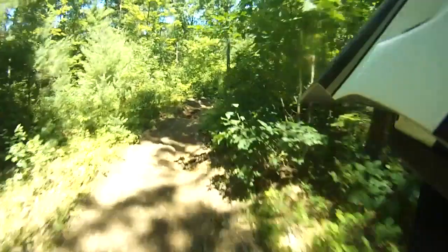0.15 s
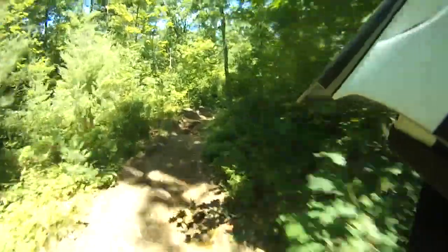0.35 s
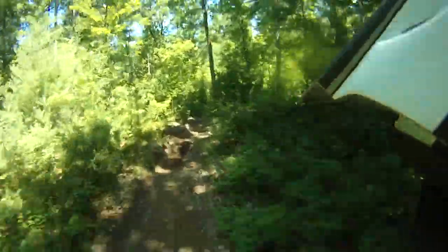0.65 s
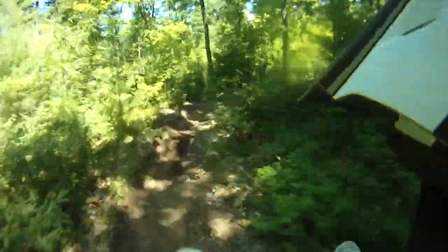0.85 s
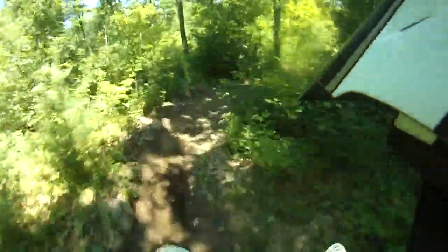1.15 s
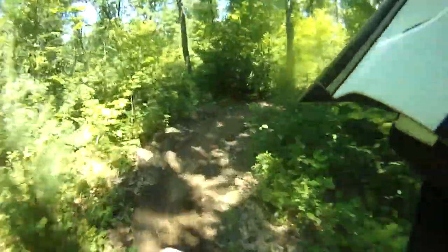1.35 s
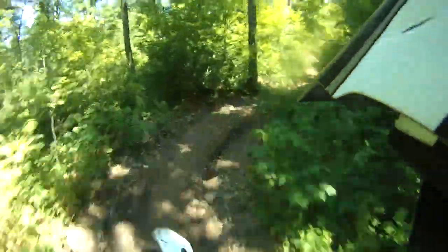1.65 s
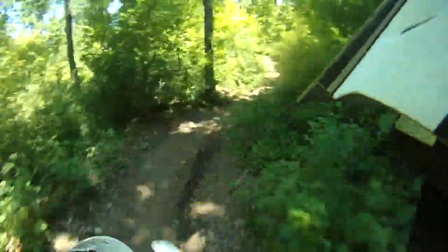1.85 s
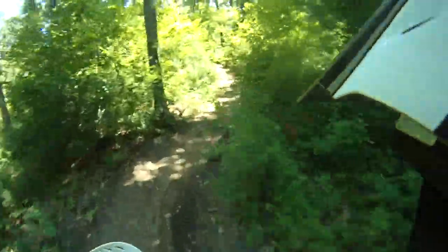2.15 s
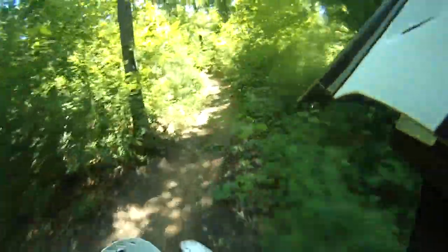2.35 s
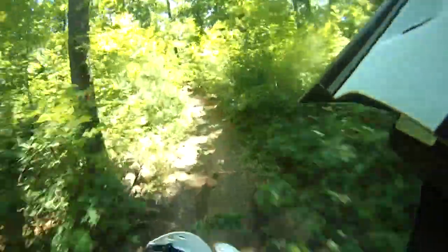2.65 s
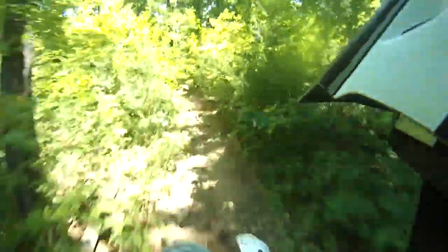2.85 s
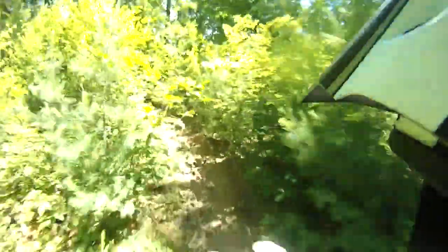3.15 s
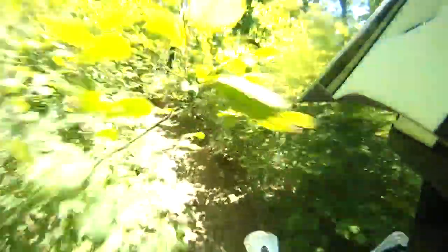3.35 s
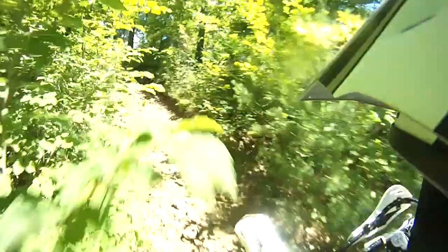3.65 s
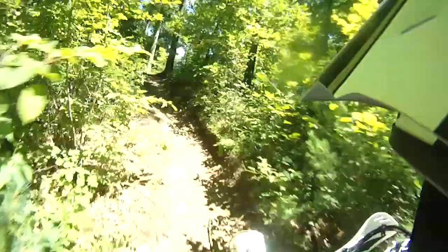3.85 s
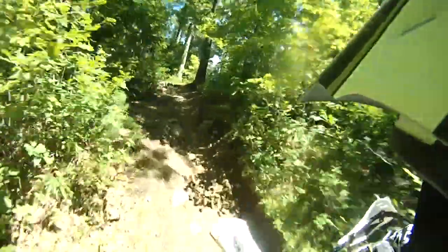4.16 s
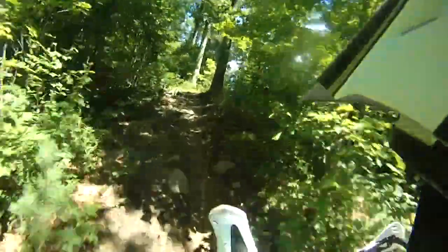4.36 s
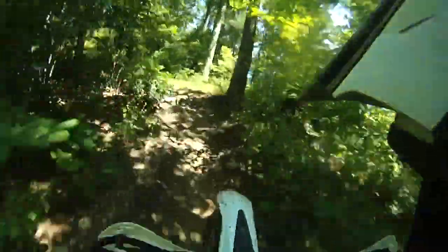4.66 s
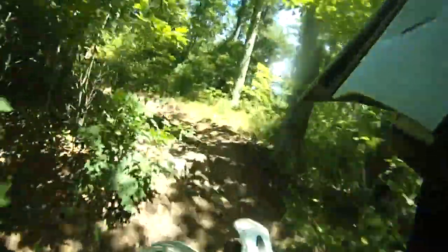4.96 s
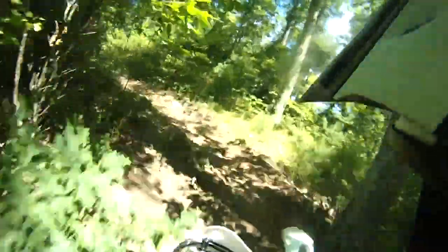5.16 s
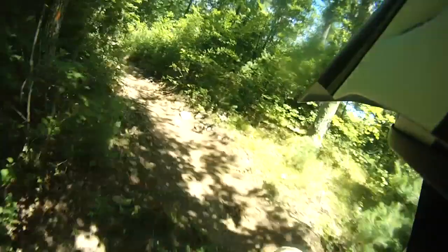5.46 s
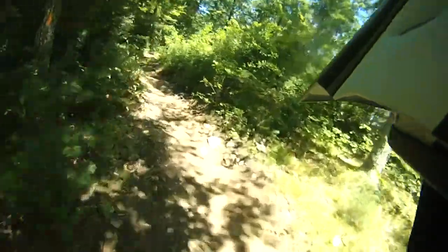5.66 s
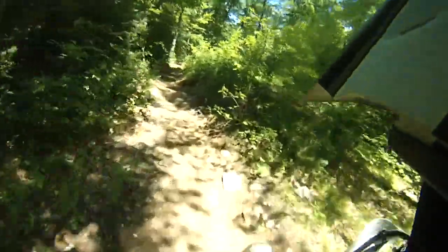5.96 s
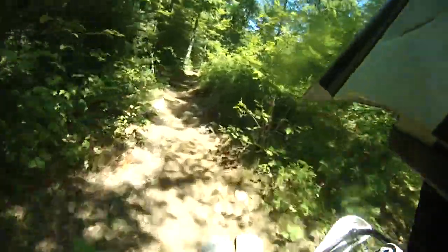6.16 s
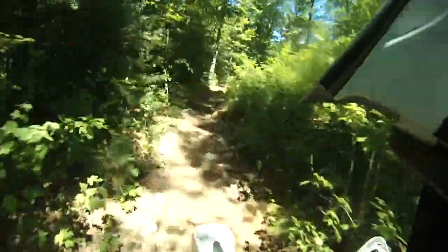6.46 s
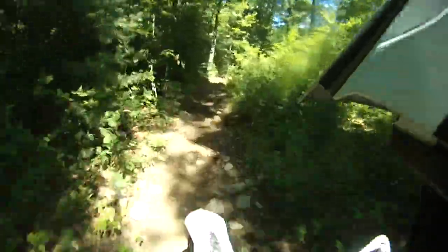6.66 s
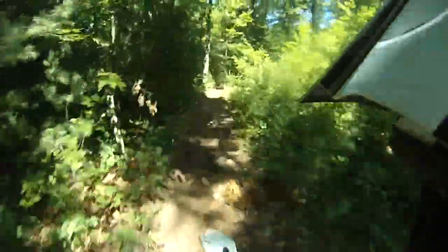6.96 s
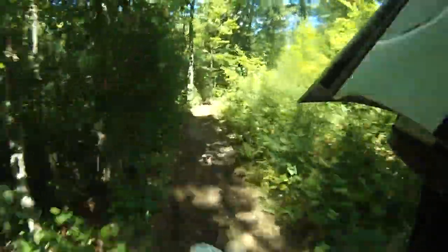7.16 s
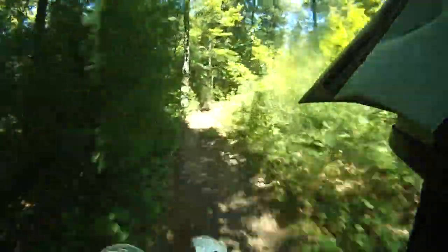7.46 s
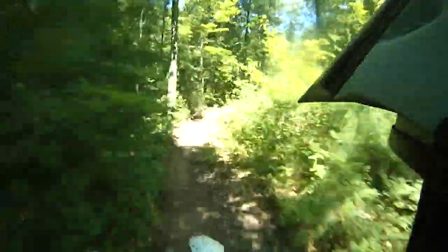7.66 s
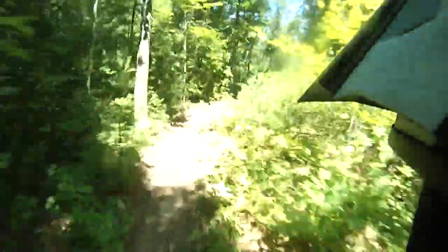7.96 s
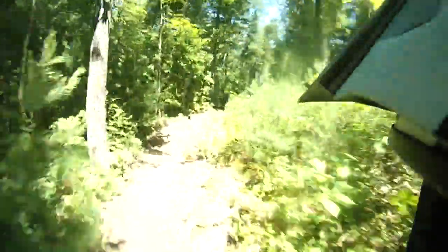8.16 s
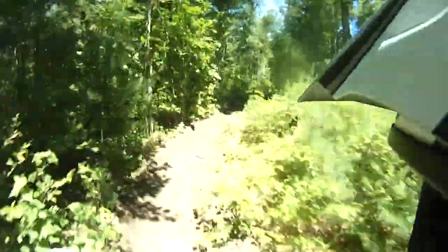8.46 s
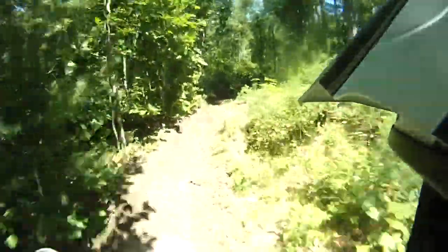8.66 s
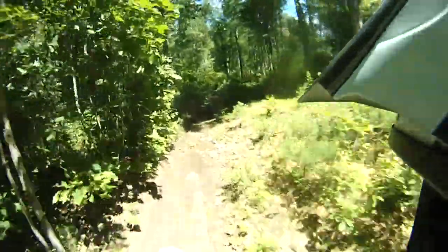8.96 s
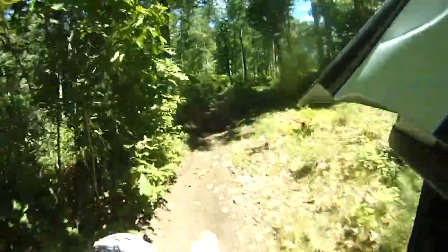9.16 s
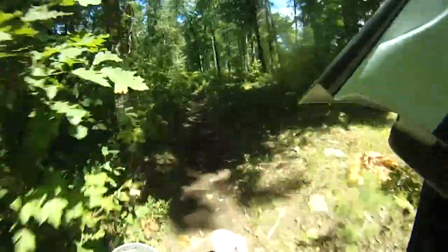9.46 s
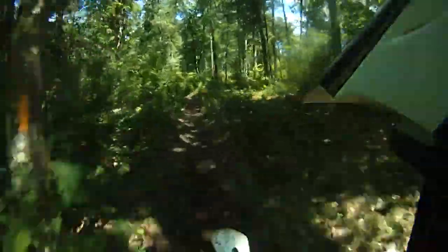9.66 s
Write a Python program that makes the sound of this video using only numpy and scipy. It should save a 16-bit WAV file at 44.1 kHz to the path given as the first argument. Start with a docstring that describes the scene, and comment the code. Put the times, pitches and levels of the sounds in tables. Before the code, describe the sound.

A two-stroke dirt bike on a wooded trail, heard from the rider's helmet. It first coasts with a quiet, uneven sputter and chain rattle, then barks through several throttle bursts. A violent crunch of branches and hard knocks interrupts a coasting gap. More revs, a long lull and another raspy run follow, with a smaller branch snap and wind pops late on.

```python
"""Two-stroke dirt bike on a trail

A two-stroke dirt bike on a wooded trail, heard at a microphone on the rider's helmet.
Throttle bursts pass firing pulses through exhaust resonances; between them noise sputters and rattles.
Damped modes thud for bumps and knocks, short filtered noise makes twigs tick and branches scrape,
steep pressure spikes crack on the helmet, and low noise buffets while gusts pop on the microphone."""
import sys
import numpy as np
from scipy import signal
from scipy.fft import rfft, irfft
from scipy.io import wavfile
from scipy.ndimage import uniform_filter1d

SR = 44100
rng = np.random.default_rng(int(sys.argv[2]) if len(sys.argv) > 2 else 0)


def unload_audio(sound):
    """Save the sound as a 16-bit wav file, at the path given as the first command line argument."""
    columns = np.transpose(np.atleast_2d(sound))
    # keep every value between -1 and 1, then stretch to whole-number steps
    steps = np.round(np.clip(columns, -1, 1) * 32767)
    wavfile.write(sys.argv[1], SR, steps.astype(np.int16))


N = 432180
TIME = np.arange(N) / SR


def amp(db):
    """Decibel law: level in dB to amplitude gain."""
    return 10 ** (np.asarray(db) / 20)


def unit(x):
    """Power normalisation: scales to rms 1."""
    return x / np.sqrt(np.mean(x ** 2) + 1e-20)


def steady(x):
    """Short-time power normalisation: evens out the slow level but keeps the single pulses."""
    power = uniform_filter1d(uniform_filter1d(x ** 2, size=2600), size=2600)
    return x / np.sqrt(np.abs(power) + 1e-12)


def blend(a, b, share):
    """Linear interpolation from a to b as the share goes from 0 to 1."""
    return a + (b - a) * share


def curves(rows):
    """Piecewise linear interpolation of rows (s, values): one curve a column."""
    s, *columns = rows[np.argsort(rows[:, 0])].T
    return [np.interp(TIME, s, c) for c in columns]


def add(mix, s, sound):
    """Superposition: mixes a sound in at time s."""
    part = mix[max(round(s * SR), 0):][:len(sound)]
    part += sound[:len(part)]


def wander(per_s):
    """Random modulation: straight lines between per_s random values a second, rms 1."""
    return unit(np.interp(TIME * per_s, np.arange(N), rng.standard_normal(N)))


def colour(x, points, tilt_db=0, size=4096):
    """Minimum-phase filtering: a causal response of given spectrum, tilted in dB per octave above 512 Hz."""
    octaves = np.log2(np.abs(np.fft.fftfreq(size, 1 / SR)) + 1)
    hz, db = np.transpose(points)
    treble = np.maximum(octaves - 9, 0)
    log_gain = np.log(amp(np.interp(octaves, np.log2(hz), db) + tilt_db * treble))
    # the Hilbert transform of the log gain gives the minimum phase
    ring = np.fft.ifft(np.exp(np.conj(signal.hilbert(log_gain)))).real
    return signal.oaconvolve(x, ring)[:len(x)]


def resonate(x, hz, width_hz):
    """Simple resonance: one fixed damped mode of gain 1 at its centre."""
    pole = np.exp((2j * hz - width_hz) * np.pi / SR)
    return 2 * signal.lfilter([1 - abs(pole)], [1, -pole], x + 1e-18).real


def slide(x, hz, width_hz):
    """Heterodyne filtering: a resonance of gain 1 whose centre follows a curve."""
    turn = np.exp(2j * np.pi * np.cumsum(hz) / SR)
    r = np.exp(-np.pi * width_hz / SR)
    baseband = signal.lfilter([1 - r], [1, -r], x / turn + 1e-18)
    return 2 * (turn * baseband).real


def disperse(x, echoes):
    """All-pass reverberation: waves bounce to and fro, spreading each pulse but keeping its spectrum."""
    spectrum, hz = rfft(x), np.fft.rfftfreq(N, 1 / SR)
    for trip_s, share in echoes:
        delay = np.exp(-2j * np.pi * hz * trip_s)
        back = np.clip(share, 0, .85)
        spectrum = spectrum * (delay - back) / (1 - back * delay)
    return irfft(spectrum, N)


# Crank speed. Each row: time in seconds, firings per second.
CRANK_SPEED = [(0, 67), (1.818, 49), (1.87, 78), (1.911, 76), (1.952, 61), (2.0, 67.5), (2.121, 66),
               (2.21, 70.5), (2.27, 66.5), (2.32, 60), (2.36, 47.3), (2.42, 48), (2.499, 50), (2.65, 53.5),
               (2.74, 57.3), (2.88, 58), (2.97, 62.5), (3.036, 56.3), (3.12, 65.4), (3.21, 66.5),
               (3.301, 54), (3.68, 51), (3.84, 62), (3.931, 50), (4.0, 57), (4.114, 66.5), (4.175, 57.3),
               (4.29, 66), (4.4, 67), (4.549, 64.3), (4.7, 67), (5.979, 41), (6.032, 46.4), (6.081, 58),
               (6.16, 70), (6.218, 64), (6.3, 57.5), (6.391, 53), (6.44, 55), (6.55, 52.3), (6.605, 62),
               (6.723, 59.8), (6.92, 66), (6.97, 65.3), (7.049, 67.2), (7.551, 65), (8.88, 48.7),
               (8.999, 70), (9.059, 69), (9.16, 62.8), (9.28, 66.7), (9.381, 64), (9.5, 66), (9.599, 71),
               (9.699, 73.3), (9.8, 72.3)]
# Overrun with the throttle shut, louder the faster the bike rolls.
# Each row: time in seconds, relative sputter level in dB.
COAST_LEVEL = [(0, -51.5), (0.371, -47), (0.599, -51.5), (.95, -52.5), (1.25, -58.5), (1.78, -56),
               (2.499, -50), (3.33, -50.5), (3.45, -45), (3.659, -59.5), (4.648, -48), (5.049, -55),
               (5.949, -55), (7.15, -41.5), (7.679, -44.5), (7.898, -49.5), (8.25, -45), (8.36, -53),
               (8.6, -59.5), (8.88, -60)]
# unevenness of combustion (0-1): shut, pulling cleanly, and added per Hz below the clean speed
ROUGH_SHUT, ROUGH_PULLING, LUG_PER_HZ, CLEAN_HZ = .62, .11, .002, 64
COAST_BARK_DB, COAST_HEAT = -1.5, 0.51
# mechanical noise grows more slowly than the exhaust (slope in dB per dB)
COAST_RATTLE_DB, LOAD_RATTLE_DB, RATTLE_SLOPE = -9, -33, 0.63
# the drive goes taut under load and rattles less
PULL_RATTLE_DB = -4
# hiss relative to rattle; off the throttle its share falls as the overrun grows louder than the pivot
COAST_HISS_DB, LOAD_HISS_DB, HISS_SLOPE, HISS_PIVOT_DB = -14, -8.5, 0.31, -47.5


def engine(burble_db=3.5, burble_per_s=22):
    """Two-stroke cycle: one firing and puff of gas a turn; throttle makes it louder, cleaner and brighter."""
    hz, = curves(np.array(CRANK_SPEED))
    coast_db, = curves(np.array(COAST_LEVEL))
    drive, bark_db, heat = throttle()
    coast = amp(coast_db + burble_db * wander(burble_per_s))
    level = np.hypot(drive, coast)
    load = (drive / level) ** 2
    rough_pulling = ROUGH_PULLING + LUG_PER_HZ * np.maximum(CLEAN_HZ - hz, 0)
    rough = np.clip(blend(ROUGH_SHUT, rough_pulling, load), 0, 1)

    turns = np.cumsum(hz) / SR
    pulses = firings(turns, rough)
    # gas flow decays after each firing, more evenly spread when combustion is rough
    port = .6 + (1 - .6 * rough) * np.exp(-(turns % 1) / .3)
    puffs = unit(port * rng.standard_normal(N))

    clatter = np.hypot(amp(coast_db + COAST_RATTLE_DB), amp(LOAD_RATTLE_DB) * drive ** RATTLE_SLOPE)
    coast_hiss_db = COAST_HISS_DB - HISS_SLOPE * (coast_db - HISS_PIVOT_DB)
    bright_db = blend(coast_hiss_db, LOAD_HISS_DB, load)
    taut_db = PULL_RATTLE_DB * load
    share_db = blend(COAST_BARK_DB, bark_db, load)
    gas_heat = blend(COAST_HEAT, heat, load)
    # subtracting taut_db leaves the hiss unchanged as the rattle drops
    return (exhaust(pulses, puffs, rough, level, share_db, gas_heat, hz)
            + machinery(pulses, puffs, rough, clatter * amp(taut_db), bright_db - taut_db)
            + buzz(turns, hz, clatter * load)
            + crackle(turns, hz, clatter * load))


# Twists of the throttle. Each row: opening in seconds, shutting in seconds, relative exhaust level in dB,
# attack time constant in seconds, power share of the pipe's upper bark in dB, gas heat from 0 to 1.
THROTTLE_TWISTS = [ (1.847, 1.968, -38, 0.0045, -7.5, 0.54), (1.962, 2.1, -42.5, 0.022, -6, 0.43),
                   (2.106, 2.277, -30.5, 0.016, -6.5, 0.35), (2.368, 2.683, -38, 0.057, -3.5, 0.56),
                   (2.68, 3.055, -37, 0.034, -9, 0.37), (3.072, 3.21, -31.5, 0.024, -7, 0.08),
                   (3.725, 3.836, -41.5, 0.01, -5, 0.48), (3.997, 4.156, -31, 0.029, -3, 0.44),
                   (4.15, 4.669, -34.5, 0.012, -4.5, 0.43), (6.04, 6.054, -35, 0.007, -2, 0.6),
                   (6.069, 6.115, -34, 0.0087, -1, 0.56), (6.146, 6.167, -24, 0.012, -6.5, 0.26),
                   (6.196, 6.516, -35.5, 0.011, -3, 0.1), (6.561, 7.141, -36, 0.02, -5, 0.54),
                   (7.32, 7.489, -40.5, 0.016, -7, 0.47), (8.943, 9.035, -38.5, .011, -5, 0.38),
                   (9.078, 9.338, -38.5, 0.056, -7, 0.63), (9.411, 9.786, -31, 0.029, -5.5, 0.53), ]
RELEASE_S, SAG_DB_PER_S = 0.023, 1.5  # every twist eases off slowly, then closes


def throttle():
    """Envelope superposition: summed amplitude of all twists, with their weighted mean bark and heat."""
    start, shut, db, attack, bark_db, heat = np.transpose(THROTTLE_TWISTS)[:, :, None]
    t = TIME[::32]
    opening = .5 * (1 + np.tanh((t - start) / (2 * attack)))
    closing = .5 * (1 - np.tanh((t - shut) / (2 * RELEASE_S)))
    sagging_db = db - SAG_DB_PER_S * (t - (start + shut) / 2)
    weight = opening * closing * amp(sagging_db) + 1e-12
    total = weight.sum(0)
    mean_bark_db = (weight * bark_db).sum(0) / total
    mean_heat = (weight * heat).sum(0) / total
    return [np.interp(TIME, t, c) for c in (total, mean_bark_db, mean_heat)]


def firings(turns, rough, spread_db=.25, rough_spread_db=5, slip=.22):
    """Periodic impulse train: one pulse a turn, uneven in size and timing when combustion is poor."""
    at = np.flatnonzero(np.diff(np.floor(turns)) > 0)
    size, late = rng.standard_normal((len(at), 2)).T
    place = at + slip * rough[at] ** 2 * late * np.gradient(at)
    pulses = np.zeros(N)
    size_db = size * (spread_db + rough_spread_db * rough[at] ** 2)
    pulses[np.clip(place, 0, N - 1).astype(int)] = amp(size_db)
    return pulses


# Spectrum of the bark above the boom. Each row: frequency in Hz, relative level in dB per Hz.
BARK_COLOUR = [(220, -22.5), (345, 13), (392, 1.5), (440, 6), (510, 0.5), (590, 2), (650, 2), (750, -7),
               (900, -20.5), (1100, -26), (2000, -23), (5000, -63)]
# Spectrum of the low sputter off the throttle. Each row: frequency in Hz, relative level in dB per Hz.
SPUTTER_COLOUR = [(50, -25.5), (130, -11.5), (220, 4), (300, -3), (400, 5), (550, -36), (1000, -54.5)]
# Upper exhaust resonance, sliding with throttle and gas heat. Each row: time in seconds, centre in Hz.
HONK_CENTRE = [(1.88, 593), (2.05, 534), (2.45, 555), (2.68, 593), (2.78, 685), (2.9, 675), (3.04, 455),
               (3.13, 520), (3.72, 589.7), (3.96, 585.4), (4.11, 538), (4.179, 427), (4.29, 538),
               (4.65, 530), (6.04, 515), (6.085, 597), (6.17, 503), (6.27, 460), (6.3, 585), (6.39, 600),
               (6.56, 597), (6.6, 494), (6.72, 469), (6.92, 520), (7.4, 549), (8.96, 466), (9.0, 557),
               (9.5, 537), (9.7, 593)]
# Echoes in the pipe that smear each pulse. Each row: round trip in seconds, share reflected.
PIPE_BOUNCES = [(.0019, 0.74), (.0036, 0.43)]
HONK_DB, HONK_WIDTH_HZ = 3, 50
STROKE_DB = 1.1  # random spread from stroke to stroke
PUTTER_DB, PUTTERS_PER_S = 6, 55


def exhaust(pulses, puffs, rough, level, share_db, heat, hz, pipe_db=5.0, bark_db=0):
    """Source and resonator: pulses boom in the pipe, with bark and one moving honk above; rough adds sputter."""
    share = np.clip(amp(share_db) ** 2, 0, .8)
    clean_boom = in_tune(pipe(pulses, heat), hz, level)
    sputter = unit(colour(puffs, SPUTTER_COLOUR))
    boom = steady((1 - rough) * clean_boom + rough * sputter)

    fronts = disperse(pulses * amp(STROKE_DB * rng.standard_normal(N)), PIPE_BOUNCES)
    clean_bark = steady(colour(fronts, BARK_COLOUR))
    breath = unit(colour(puffs, BARK_COLOUR))
    bark = steady((1 - rough) * clean_bark + rough * breath)
    honk = steady(slide(bark, curves(np.array(HONK_CENTRE))[0], HONK_WIDTH_HZ))
    bark = steady(steady(ground_echo(bark)) + amp(HONK_DB) * (1 - rough) * honk)

    putter = amp(PUTTER_DB * rough ** 2 * wander(PUTTERS_PER_S))
    low = amp(pipe_db) * np.sqrt(1 - share) * boom
    high = amp(bark_db) * np.sqrt(share) * bark
    return level * putter * (low + high)


# Spectrum of the cool exhaust chamber. Each row: frequency in Hz, relative level in dB per Hz.
PIPE_COLOUR = [(40, -52), (85, -20), (108, -11.5), (145, -29.5), (172, -16.5), (198, -0.5), (215, 1),
               (232, 9), (265, 16.5), (310, 8.5), (352, -15), (390, -20.5), (470, -16), (700, -17),
               (1500, -74)]


def pipe(pulses, heat, hot_ratio=1.159):
    """Speed of sound in hot gas: it rises with heat, and the chamber's resonance moves up."""
    cool = colour(pulses, PIPE_COLOUR)
    hot = colour(pulses, np.array(PIPE_COLOUR) * [hot_ratio, 1])
    return steady(blend(cool, hot, np.clip(heat, 0, 1)))


# the chamber comes into tune at high revs on a wide throttle
TUNED_FROM_HZ, TUNED_SPAN_HZ, TUNED_WIDTH_HZ, FLAT_OUT_DB = 68, 3, 65, -30


def in_tune(boom, hz, level, order=4):
    """Harmonic locking: flat out, the chamber favours one multiple of the firing rate and sounds lean."""
    fast = np.clip((hz - TUNED_FROM_HZ) / TUNED_SPAN_HZ, 0, 1)
    wide_open = np.minimum(level / amp(FLAT_OUT_DB), 1) ** 2
    return steady(blend(boom, slide(boom, order * hz, TUNED_WIDTH_HZ), fast * wide_open))


# mean delay and sway in s, share reflected
GROUND_S, GROUND_SWAY_S, GROUND_SHARE, SWAYS_PER_S = .0052, .00035, .5, 4


def ground_echo(x):
    """Comb interference: a reflection's path changes as the rider moves, so overtones swell and fade."""
    delay = GROUND_S + GROUND_SWAY_S * uniform_filter1d(wander(SWAYS_PER_S), size=4000)
    return x + GROUND_SHARE * np.interp(TIME - delay, TIME, x)


# Echoes in the pipe wall that smear each pulse. Each row: round trip in seconds, share reflected.
WALL_BOUNCES = [(.00053, 0.7), (.00091, 0.8), (.00147, .6), (.00231, 0.61)]
# Spectrum of the pipe wall's ring under load. Each row: frequency in Hz, relative level in dB per Hz.
RASP_SPECTRUM = [(500, -29), (850, 12), (1000, 11), (1250, 4.5), (1490, 7.5), (1710, 7), (1880, 8),
                 (2020, 9), (2200, 0.5), (2530, 14), (3100, 0.5), (3600, -17), (4500, -49.5), (9000, -65.5)]
# Spectrum of the slack chain's rattle. Each row: frequency in Hz, relative level in dB per Hz.
RATTLE_SPECTRUM = [(350, -33), (620, -19), (830, 6), (1100, 4.5), (1400, 3), (1750, 0), (2300, 2.5),
                   (3000, -13), (3600, -19), (4500, -44.5), (9000, -101.5)]
# Spectrum of the mechanical hiss. Each row: frequency in Hz, relative level in dB per Hz.
HISS_SPECTRUM = [(2800, -12), (3900, -6), (4300, -6), (4720, -6.5), (5100, -7), (5600, -15.5), (6100, -8),
                 (6450, -13.5), (6950, -7), (7500, -19.5), (9200, -12.5), (10500, -24.5), (13500, -29),
                 (15500, -52)]
GRIT_S, GRIT_SHARE = .0022, .6  # decay of the noise after each stroke, and its share


def machinery(pulses, puffs, rough, clatter, bright_db, rattle_db=4.5, hiss_db=0, slap_db=1.5):
    """Structure-borne sound: firings rasp in the pipe wall under load; a slack chain rattles off it."""
    strokes = pulses * amp(STROKE_DB * rng.standard_normal(N))
    grit_envelope = signal.lfilter([1], [1, -np.exp(-1 / (GRIT_S * SR))], strokes)
    grit = grit_envelope * rng.standard_normal(N)
    smeared = disperse(disperse(strokes, WALL_BOUNCES), PIPE_BOUNCES)
    clacks = steady(unit(smeared) + GRIT_SHARE * unit(grit))

    load = .96 * (1 - rough) ** 1.5
    rasp = np.sqrt(load) * steady(steady(colour(clacks, RASP_SPECTRUM)) + wall_ring(clacks))
    rattle = np.sqrt(1 - load) * unit(colour(puffs, RATTLE_SPECTRUM))
    hiss = steady(colour(load * clacks + puffs, HISS_SPECTRUM))
    level = clatter * amp(slap_db * rough * wander(90))
    return level * (amp(rattle_db) * (rasp + rattle) + amp(hiss_db + bright_db) * hiss)


# Sharpest modes of the pipe wall. Each row: frequency in Hz, relative level in dB.
WALL_RESONANCES = [(1510, -18), (1850, -14.5), (2130, -13.5), (2500, -6.5), (3150, -17), (4690, -21)]
WALL_WIDTH_HZ, FLARE_DB, FLARES_PER_S = 90, 4.5, 24


def wall_ring(clacks, ring_db=0):
    """Modal superposition: the wall's modes flare and fade independently as the bike shakes."""
    total = 0
    for hz, db in WALL_RESONANCES:
        mode = resonate(resonate(clacks, hz, WALL_WIDTH_HZ), hz, 1000)
        total = total + amp(db) * unit(mode * amp(FLARE_DB * wander(FLARES_PER_S)))
    return amp(ring_db) * total


# Spectrum of the clean overtones. Each row: frequency in Hz, relative level in dB per Hz.
BUZZ_SPECTRUM = [(650, -25), (810, -1), (930, 0), (1120, -3), (1300, -10), (1520, -4), (1900, -6),
                 (2600, -11), (3600, -35)]
BUZZ_DB, BUZZ_DB_PER_HZ = -2, .3  # relative to the mechanical noise; growth with firing rate


def buzz(turns, hz, level):
    """Harmonic series: clean firing gives sharp overtones above the bark, stronger at high revs."""
    even = disperse(firings(turns, np.zeros(N)), PIPE_BOUNCES)
    overtones = steady(ground_echo(colour(even, BUZZ_SPECTRUM)))
    return level * amp(BUZZ_DB + BUZZ_DB_PER_HZ * (hz - CLEAN_HZ)) * overtones


# Spectrum of the crackle at the port. Each row: frequency in Hz, relative level in dB per Hz.
CRACKLE_SPECTRUM = [(700, -32), (1400, 4), (2050, 5.5), (2600, -4.5), (3300, -7.5), (4000, -28),
                    (4750, -14.5), (5600, -33), (6900, -25.5), (11000, -60)]
# relative to the mechanical noise; growth as the firing rate falls; time from opening to peak
CRACKLE_DB, CRACKLE_DB_PER_HZ, CRACKLE_S = 1, .2, .0014


def crackle(turns, hz, level):
    """Jet turbulence: gas tears through the opening port, one burst a stroke, clearest when lugging."""
    age = (turns % 1) / hz / CRACKLE_S
    bursts = colour(age * np.exp(-age) * rng.standard_normal(N), CRACKLE_SPECTRUM)
    return level * amp(CRACKLE_DB + CRACKLE_DB_PER_HZ * (CLEAN_HZ - hz)) * unit(bursts)


# Single firings, stray while coasting and sharp as the engine catches.
# Each row: start in seconds, peak level in dB.
LONE_FIRINGS = [(0.329, -50), (1.821, -36.5), (3.386, -35), (3.687, -39), (3.704, -30), (3.943, -26.5),
                (5.997, -36.5), (6.017, -38), (6.041, -26), (7.41, -32), (8.913, -40.5)]


def catches():
    """Impulse response: a lone full charge thumps the pipe."""
    out, pulse = np.zeros(N), signal.unit_impulse(SR // 20)
    thump = colour(pulse, PIPE_COLOUR) + .5 * colour(pulse, BARK_COLOUR)
    for s, db in LONE_FIRINGS:
        add(out, s, amp(db) * thump / np.abs(thump).max())
    return out


# Knocks on the helmet and bodywork. Each row: start in seconds, relative level in dB,
# frequency in Hz, 60 dB decay time in seconds.
BODY_KNOCKS = [(1.221, -50, 675, 0.11), (3.451, -18, 228, 0.19), (3.479, -4, 204, 0.037),
               (3.52, -7.5, 235, 0.019), (3.5385, 1, 270, 0.02), (7.749, -16.5, 421, 0.069),
               (7.752, -22.5, 726, 0.05), (8.2972, -17.5, 1170, 0.0097)]
# Bumps through the chassis. Each row: start in seconds, relative level in dB, frequency in Hz.
CHASSIS_BUMPS = [(0.494, -33, 55), (0.953, -33, 64), (3.551, -18.5, 110.5), (3.585, -22, 60.5),
                 (4.664, -21, 115), (4.72, -28, 72.7), (4.852, -31, 87), (6.949, -31, 122),
                 (7.33, -33, 157.3), (7.559, -30, 150), (8.169, -34, 114.6), (8.423, -36, 58.2),
                 (8.468, -22.5, 86.5), (8.503, -27, 115), (9.641, -32, 160)]
BUMP_T60_S = 0.1


def blows(rise_cycles=0.42):
    """Damped free vibration: each knock or bump rings one heavily damped low mode."""
    out, t = np.zeros(N), TIME[:SR // 3]
    bumps = [(*bump, BUMP_T60_S) for bump in CHASSIS_BUMPS]
    for s, db, hz, t60 in [*BODY_KNOCKS, *bumps]:
        onset = 1 - np.exp(-t * hz / rise_cycles)
        add(out, s, -amp(db - 60 * t / t60) * np.sin(2 * np.pi * hz * t) * onset)
    return out


# Sharp cracks of sticks on the helmet. Each row: start in seconds, peak level of the spike in dB,
# spike time constant in seconds, rise time constant as a share of it.
STICK_CRACKS = [(3.48, -14.5, 0.0005, 0.17), (3.4907, -25, 0.00033, 0.11), (3.5387, -5.5, 0.00056, 0.2),
                (7.745, -14.5, 0.00005, .15), (8.2977, -34, 0.00021, .9)]
# Spectrum of the helmet shell when scraped or struck. Each row: frequency in Hz, relative level in dB per Hz.
SHELL_COLOUR = [(15, -71.5), (150, 12.5), (500, 15.5), (1500, 5.5), (2500, 1.5), (3000, 3.5), (3750, -4),
                (4500, 3), (5600, -6.5), (8500, -9.5), (11000, -21), (14500, -27), (17000, -64.5)]


def cracks(ring_db=-9):
    """Impact excitation: a stick's steep pressure spike on the shell, then the shell's short ring."""
    out, t = np.zeros(N), TIME[:SR // 30]
    for s, db, width, rise_share in STICK_CRACKS:
        spike = (t / width - 1) * np.exp(-t / width) * (1 - np.exp(-t / (rise_share * width)))
        ring = colour(spike, SHELL_COLOUR)
        add(out, s, amp(db) * (spike / np.abs(spike).max() + amp(ring_db) * ring / np.abs(ring).max()))
    return out


# Branches dragging over the helmet. Each row: start in seconds, rms level over the length in dB,
# length in seconds, brightness in dB per octave.
BRANCH_SCRAPES = [(3.4725, -25, 0.0098, 1), (3.477, -23, 0.0036, 0), (3.4854, -17.5, 0.0084, 1.5),
                  (3.4889, -30, 0.0022, -14), (3.492, -31, 0.013, -0.5), (3.495, -36.5, 0.049, -0.5),
                  (3.521, -27.5, 0.019, -2), (3.533, -33.5, 0.004, 11), (3.551, -39, 0.012, 2),
                  (3.568, -57.5, 0.034, 1.5), (7.7297, -32.5, 0.006, 6.5), (7.736, -29, 0.012, 5),
                  (7.743, -21.5, 0.0049, 11.5), (7.747, -25.5, 0.011, -2), (8.2965, -45, 0.002, 16)]


def branches(grain_db=5):
    """Friction noise: leaves and twigs scrape the shell in short crunches of uneven grain."""
    out, t = np.zeros(N), TIME[:SR // 12]
    for s, db, length, tilt_db in BRANCH_SCRAPES:
        noise, grain = rng.standard_normal((2, len(t)))
        stroke = np.minimum(4 * t / length, 1) * np.exp(-(t / length) ** 4)
        crunch = colour(noise * stroke * amp(grain_db * grain), SHELL_COLOUR, tilt_db)
        add(out, s, amp(db) * crunch * np.sqrt(length * SR / np.sum(crunch ** 2)))
    return out


# Bodywork juddering over rough ground. Each row: start in seconds, relative level in dB,
# length in seconds, frequency in Hz.
BODY_JUDDERS = [(0.811, -47, 0.061, 330), (0.965, -48.5, 0.019, 300), (1.087, -47.5, 0.071, 279),
                (1.212, -44.5, 0.041, 370), (1.518, -52, 0.012, 330), (3.555, -36, 0.035, 250),
                (4.674, -30.5, 0.014, 302), (4.836, -40.5, 0.021, 243), (4.878, -42.5, 0.021, 330),
                (5.109, -50, 0.087, 260), (5.192, -45, 0.043, 221), (5.494, -46.5, 0.048, 233)]


def judders(width_hz=260):
    """Forced random vibration: rough ground shakes the bodywork in short dull bursts."""
    out, t = np.zeros(N), TIME[:SR // 6]
    for s, db, length, hz in BODY_JUDDERS:
        noise = rng.standard_normal(len(t))
        shake = unit(resonate(resonate(noise, hz, width_hz), hz, 2 * width_hz))
        add(out, s, amp(db) * shake * np.minimum(4 * t / length, 1) * np.exp(-(t / length) ** 4))
    return out


# Twigs and grit ticking against the bike. Each row: start in seconds, relative level in dB.
TWIG_TICKS = [(0.6198, -45), (0.925, -39), (0.9387, -49), (1.0524, -47.5), (1.1563, -54), (1.222, -60),
              (1.303, -43.5), (1.6, -50.5), (1.8052, -41), (1.854, -56), (1.88, -39.5), (1.907, -46),
              (3.788, -47), (4.883, -47), (8.0356, -40)]
# Spectrum of a tick. Each row: frequency in Hz, relative level in dB per Hz.
TICK_SPECTRUM = [(200, -5), (600, 1), (1300, -4), (2200, 6), (3100, 1), (3800, -13.5), (4700, -7.5),
                 (6800, -14), (9500, -28), (14000, -39)]


def twigs(t60=0.06, rise_s=0.0005, tick_db=-5):
    """Exponential decay: small dry ticks of coloured noise die away quickly."""
    out, t = np.zeros(N), TIME[:SR // 10]
    for s, db in TWIG_TICKS:
        tick = unit(colour(rng.standard_normal(len(t)), TICK_SPECTRUM))
        add(out, s, amp(db + tick_db - 60 * t / t60) * tick * (1 - np.exp(-t / rise_s)))
    return out


# Air over the helmet. Each row: time in seconds, relative level in dB.
WIND_LEVEL = [(0, -53), (.35, -47.5), (0.68, -58), (0.95, -50.5), (1.28, -64), (1.419, -56.5), (1.7, -62.5),
              (2.1, -53.5), (2.999, -53.5), (3.4, -44.5), (3.721, -57.5), (4.2, -48), (5, -55), (6.6, -51),
              (7.7, -43), (7.98, -53.5), (8.451, -42.5), (8.731, -61.5), (9.249, -57.5), (9.7, -50)]
# Brief swells of buffeting. Each row: centre in seconds, relative level in dB.
BUFFET_SWELLS = [(.51, -37.5), (.99, -52), (1.14, -55), (1.849, -43), (4.681, -35), (4.87, -37.5)]
# Spectrum of the buffeting. Each row: frequency in Hz, relative level in dB per Hz.
WIND_SPECTRUM = [(12, -6), (32, -2.5), (60, -1.5), (110, -7.5), (170, -3), (300, -16.5), (900, -65)]
BUFFET_S = 0.011


def wind(wind_db=2.0):
    """Turbulent pressure noise: lumpy low buffeting with a few brief swells."""
    level_db, = curves(np.array(WIND_LEVEL))
    swells = sum(amp(db) * np.exp(-((TIME - s) / BUFFET_S) ** 2) for s, db in BUFFET_SWELLS)
    lumps = amp(2 * wander(18))
    air = unit(colour(rng.standard_normal(N), WIND_SPECTRUM) * lumps)
    return amp(wind_db) * (amp(level_db) + swells) * air


# Gusts that block the microphone. Each row: shutting in seconds, opening in seconds,
# peak of the shutting pop in dB, peak of the opening pop in dB, sign of both pops.
MICROPHONE_GUSTS = [(8.184, 8.1923, -32, -26, 1), (8.1995, 8.2087, -24.5, -22, -1),
                    (8.217, 8.224, -30, -25, 1), (8.2865, 8.292, -39, -26, 1),
                    (8.298, 8.3086, -16.5, -25, -1), (8.355, 8.36, -27, -28, -1),
                    (8.391, 8.396, -29, -24.5, -1), (8.482, 8.4914, -45, -26, -1)]
POP_RISE_S, POP_FALL_S = 0.00045, 0.00077


def gusts(sound, edge_s=.0006, choke_db=-26):
    """Microphone overload: a gust blocks it for milliseconds, with a one-sided pop at each edge."""
    pops, blocked, t = np.zeros(N), np.zeros(N), TIME[:SR // 100]
    pop = (1 - np.exp(-(t / POP_RISE_S) ** 2)) * np.exp(-t / POP_FALL_S)
    pop = pop / pop.max()
    for shuts, opens, shut_db, open_db, sign in MICROPHONE_GUSTS:
        add(pops, shuts - t[-1], np.sign(sign) * amp(shut_db) * pop[::-1])  # swells up to the shutting
        add(pops, opens, np.sign(sign) * amp(open_db) * pop)
        blocked[round(shuts * SR):round(opens * SR)] = 1
    choke = amp(choke_db * uniform_filter1d(blocked, size=round(edge_s * SR)))
    return sound * choke + pops


def scene():
    """Superposition at one microphone, the same on both channels; gusts spare the branches and cracks."""
    choked = gusts(engine() + catches() + wind() + twigs() + judders() + blows())
    mono = choked + branches() + cracks()
    return np.array([mono, mono])


EDGE_HZ = 15300


def record(dry):
    """Band limitation: a linear-phase low-pass removes the highest treble."""
    low_pass = signal.firwin(511, EDGE_HZ, window=("kaiser", 9), fs=SR)
    return signal.oaconvolve(dry, low_pass[None], "same")


dry = scene()
out = record(dry)
unload_audio(out)
```